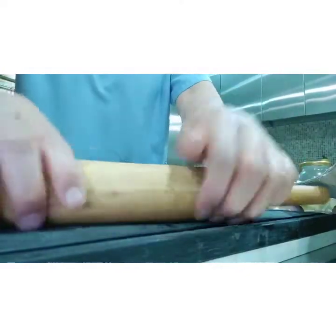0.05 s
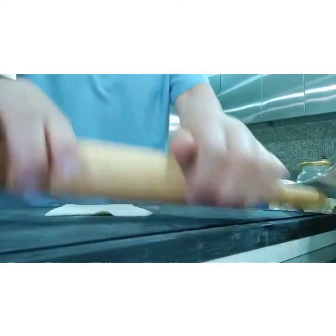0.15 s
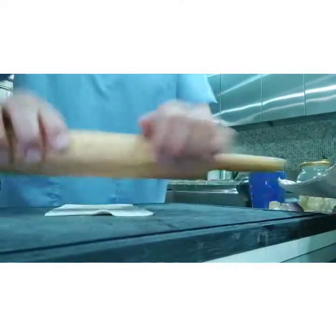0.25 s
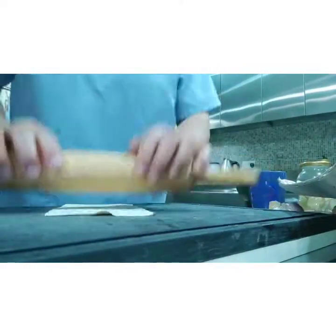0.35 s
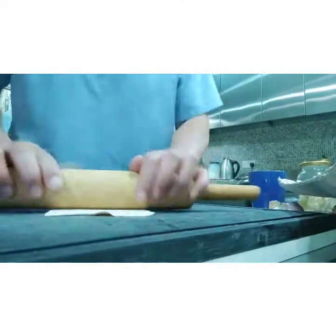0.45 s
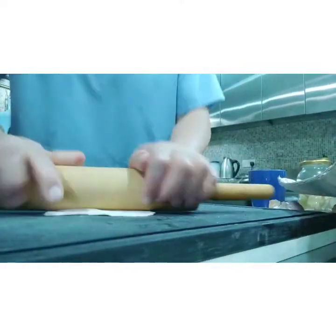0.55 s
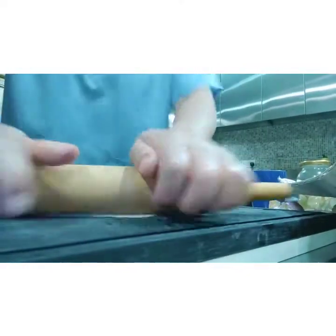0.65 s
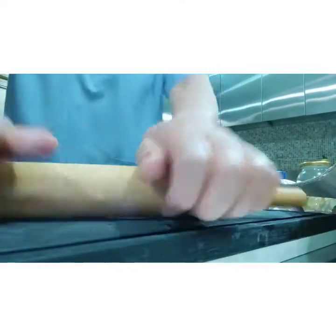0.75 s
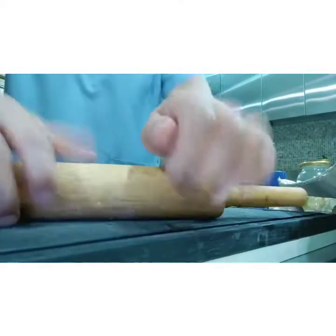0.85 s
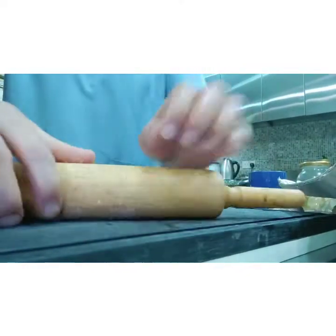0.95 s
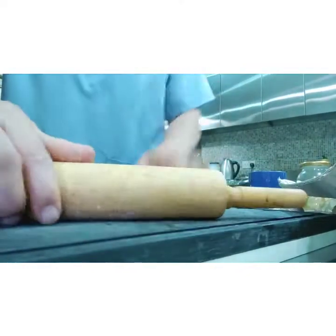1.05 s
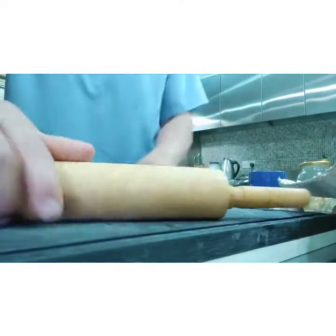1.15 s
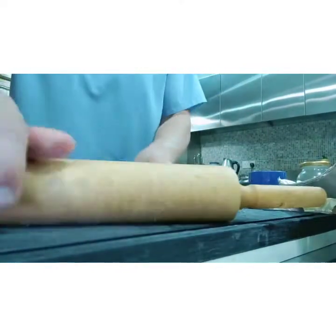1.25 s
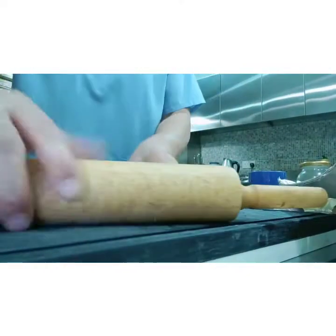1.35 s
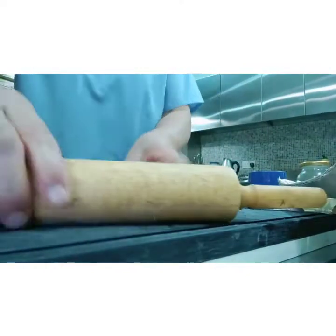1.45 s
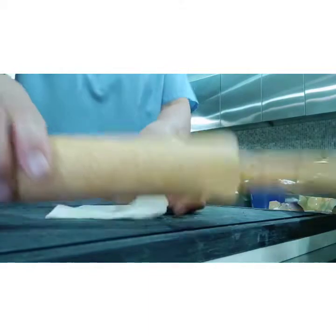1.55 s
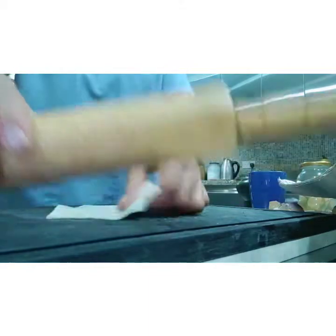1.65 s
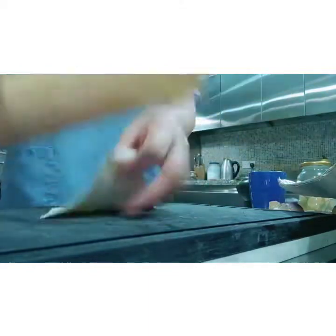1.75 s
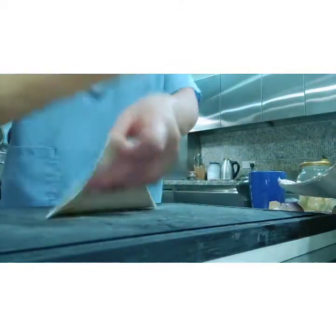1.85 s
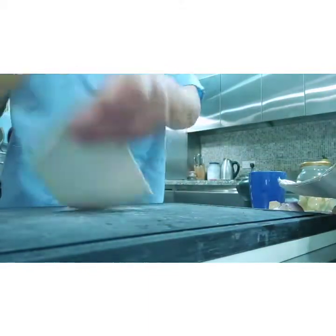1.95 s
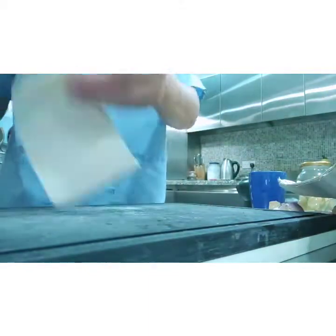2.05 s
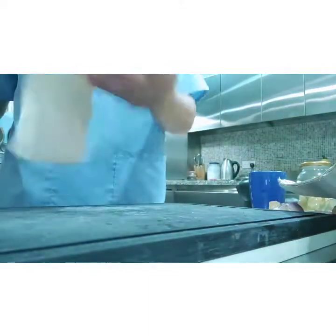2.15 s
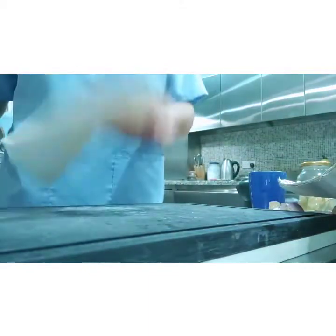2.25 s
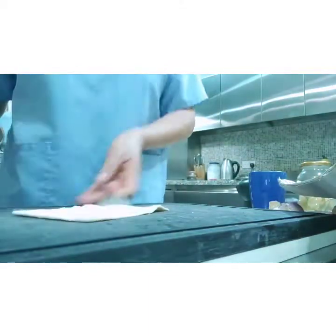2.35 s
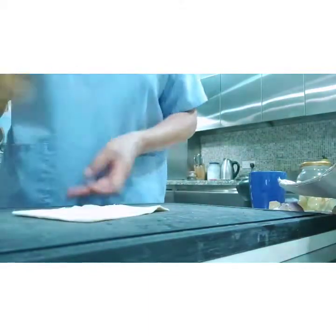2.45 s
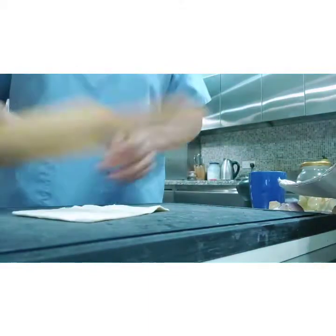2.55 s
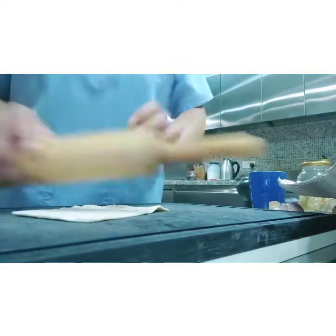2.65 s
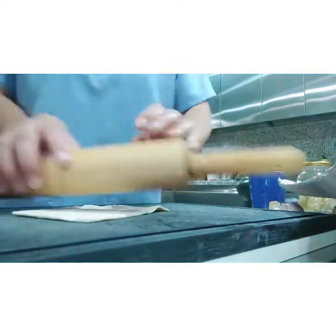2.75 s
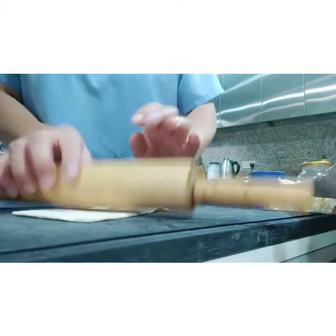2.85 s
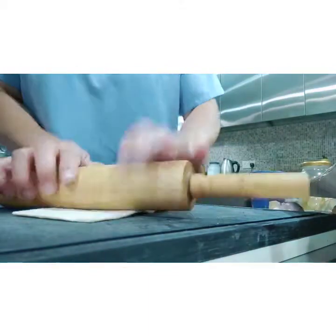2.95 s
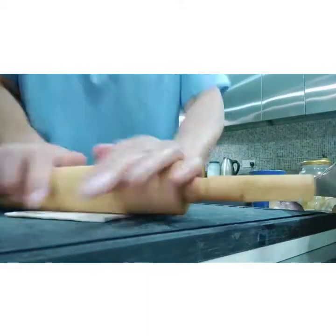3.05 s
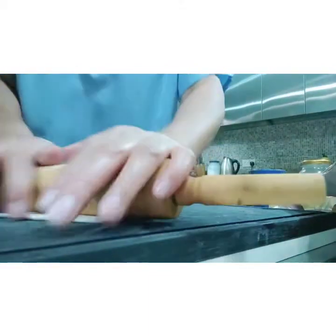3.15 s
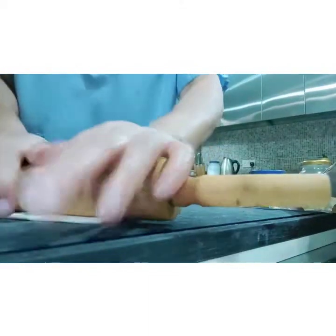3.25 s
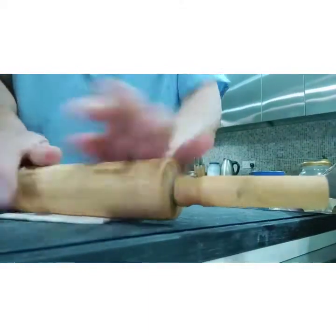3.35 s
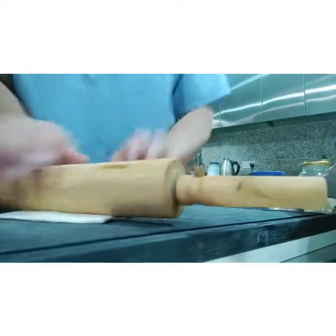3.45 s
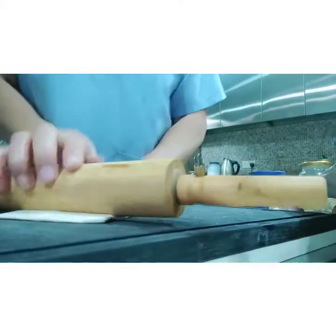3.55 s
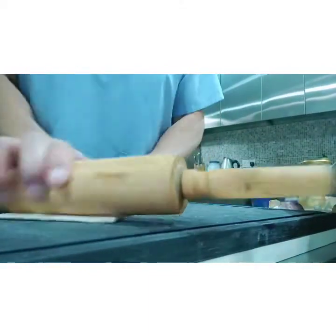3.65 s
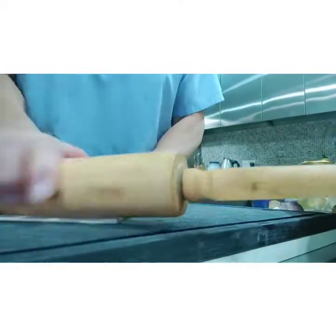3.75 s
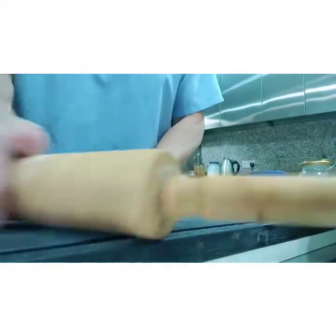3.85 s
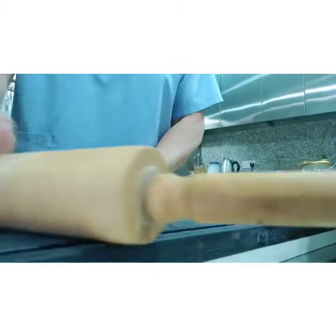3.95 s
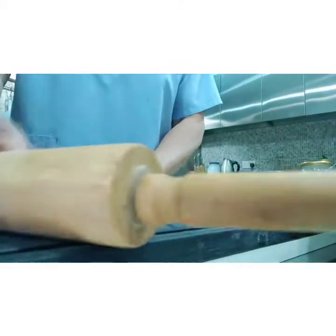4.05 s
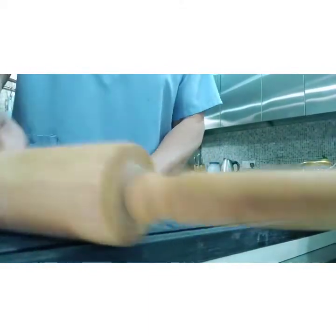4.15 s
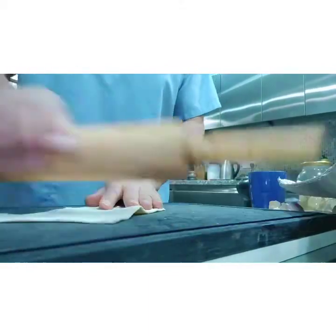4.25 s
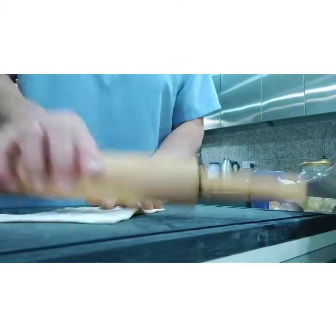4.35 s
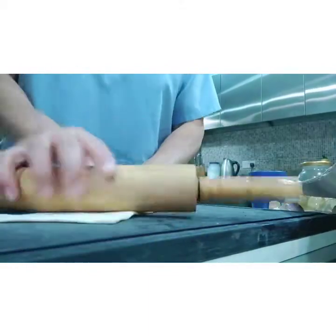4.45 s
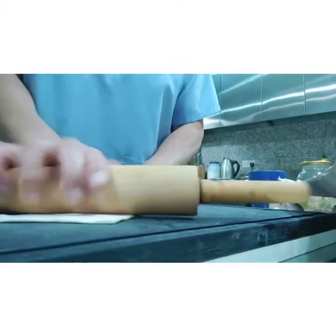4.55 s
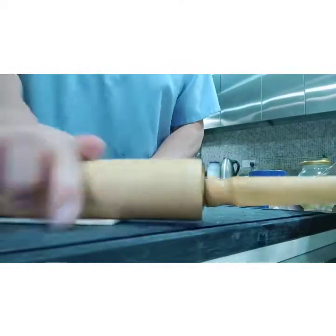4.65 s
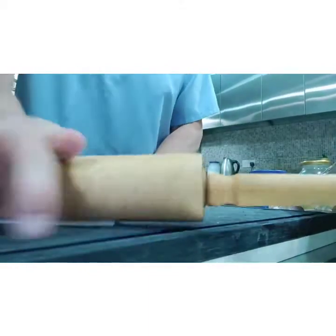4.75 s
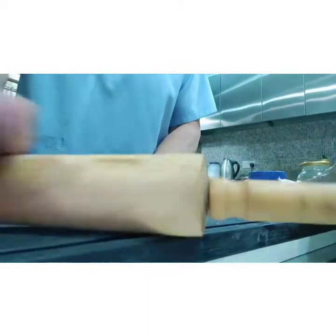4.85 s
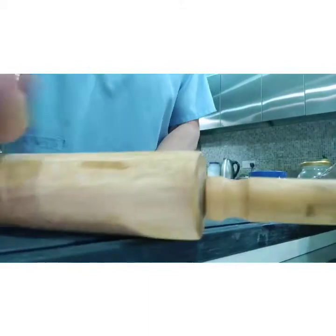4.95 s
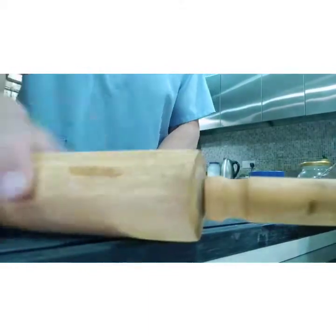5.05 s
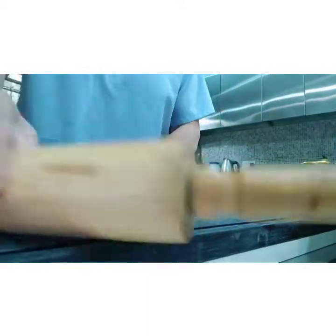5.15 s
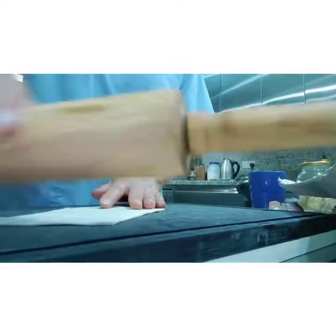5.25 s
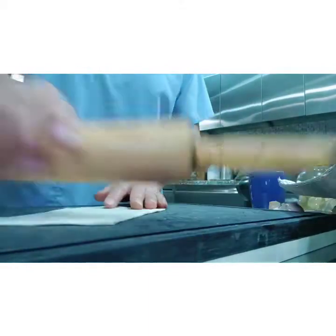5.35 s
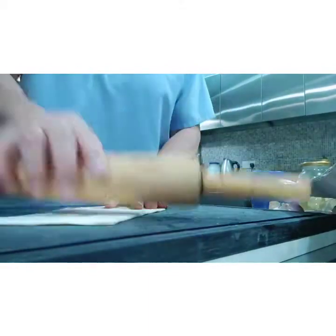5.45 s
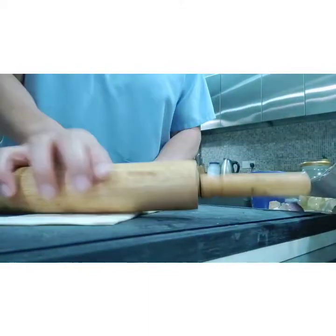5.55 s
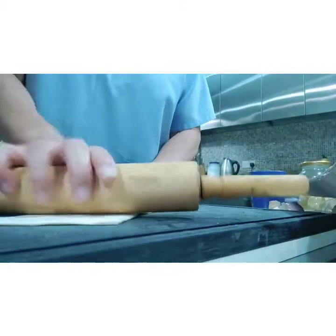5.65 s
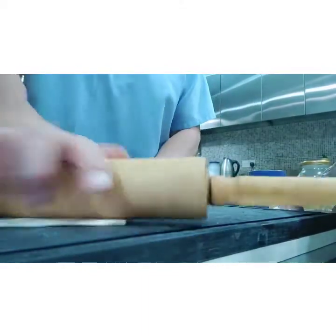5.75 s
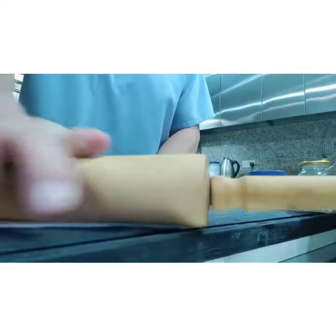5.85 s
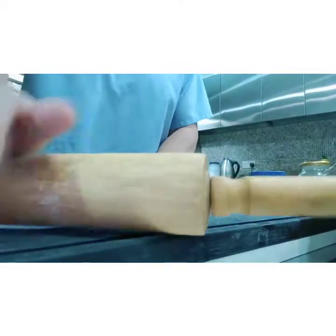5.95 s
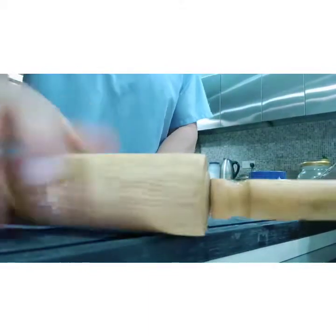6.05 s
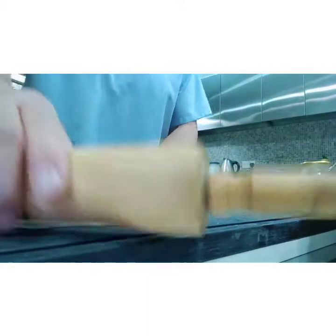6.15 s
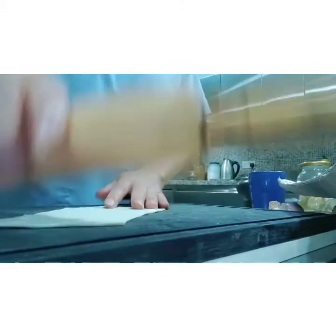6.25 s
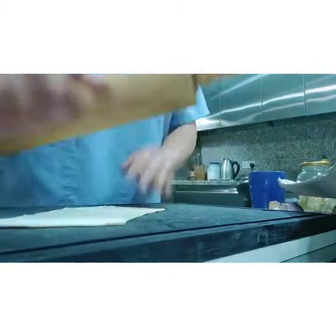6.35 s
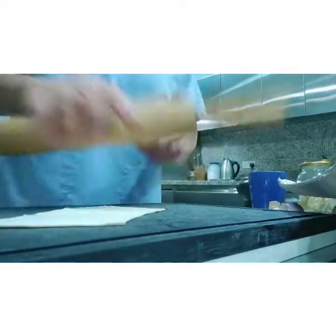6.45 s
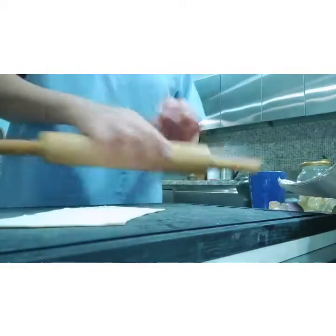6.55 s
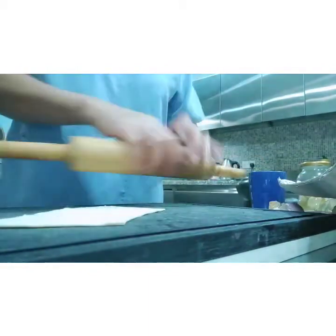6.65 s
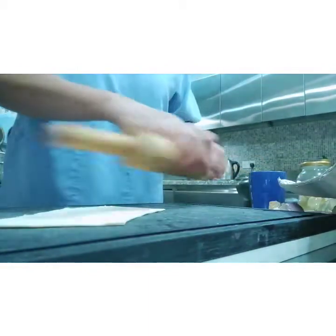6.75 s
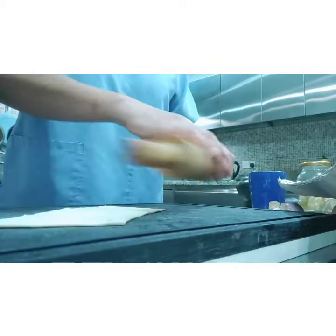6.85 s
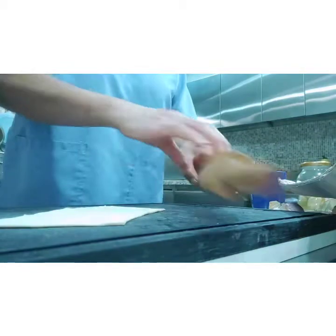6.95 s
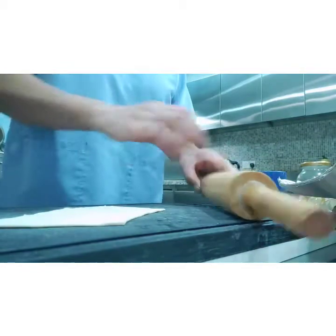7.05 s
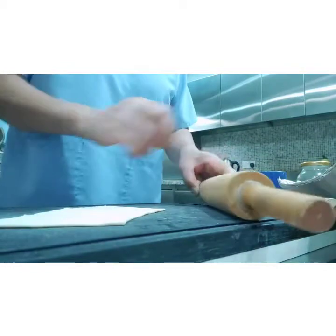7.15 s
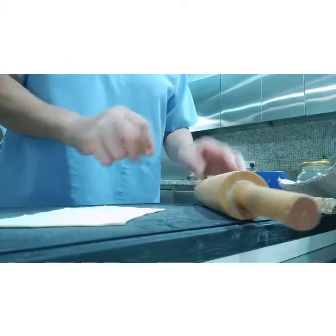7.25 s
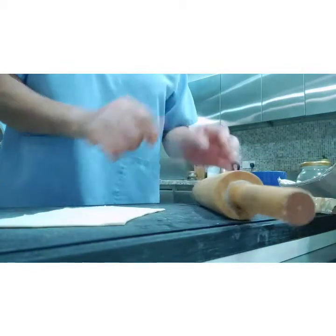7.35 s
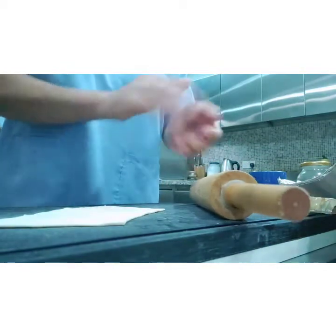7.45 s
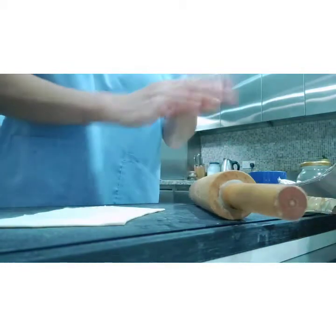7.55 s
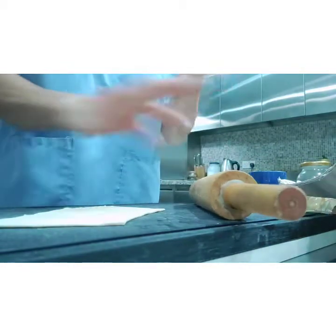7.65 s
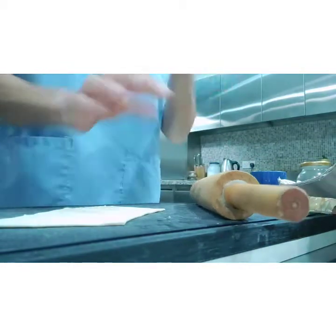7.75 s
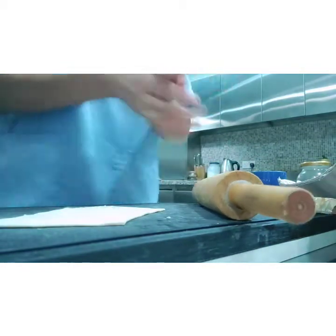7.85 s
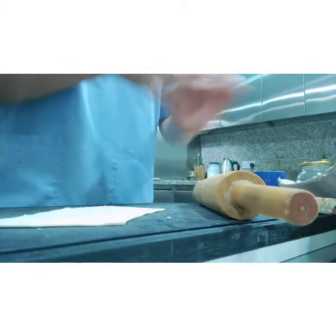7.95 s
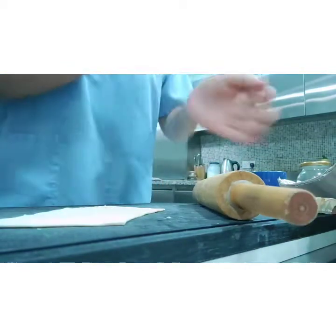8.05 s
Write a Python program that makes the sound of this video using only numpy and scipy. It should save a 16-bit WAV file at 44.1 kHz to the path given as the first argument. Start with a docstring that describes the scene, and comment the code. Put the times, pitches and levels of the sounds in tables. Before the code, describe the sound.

Over continuous low fan noise, someone rolls dough close to the microphones in a small, lightly echoing kitchen. A dull puffy thud opens, followed by small wooden knocks, a quiet gap, soft slaps and a thump. A crisp knock leads into a cluster of wood blows with bright rattling glass. Sparse knocks and faint hisses continue until one heavy wooden clack, then brushing palms and a final clap.

```python
"""Close pair of microphones by a kitchen counter, 8.1 s, with a fan as steady noise throughout.
0.3 s: a rolling pin thuds on dough (puffs of air, low board notes), then bare wood knocks (snap and ring).
2.3-2.9 s: soft slaps, a thud and a knock; 3.2 s: a hissing rub; 3.8-4.4 s: hard knocks, and a glass dish
nearby clinks and chatters (beating modes). 4.8-6.1 s: scattered knocks, rubs, a slap and faint glass.
6.8-7.1 s: short notes, the loudest knock, more glass; to the end: floury hands rub, pop and slap."""
import sys
import numpy as np
from scipy import signal
from scipy.fft import rfft, irfft, next_fast_len
from scipy.io import wavfile
from scipy.ndimage import uniform_filter1d

SR = 44100
rng = np.random.default_rng(int(sys.argv[2]) if len(sys.argv) > 2 else 0)


def to_wav(s):
    """Save 16-bit WAV."""
    ch = np.atleast_2d(s).T  # columns
    pcm = np.round(np.clip(ch, -1, 1) * 32767)  # PCM
    wavfile.write(sys.argv[1], SR, pcm.astype(np.int16))


def makeup_ratio(level_db):
    """Linear amplitude ratio for a level in decibels (20 dB per factor of ten)."""
    decades = np.asarray(level_db, float) / 20
    return 10 ** decades


N = 357210  # length in samples

# Fan noise spectrum, relative: f/Hz, density level/dB
FAN_SPECTRUM = [(20, 2.5), (45, -3.5), (65, -0.5), (200, -4.5), (500, -5.5), (1000, -16), (2000, -22),
                (7000, -37.5), (16000, -39)]
# The kitchen's standing waves: f/Hz, width/Hz, level over the fan/dB
STANDING_WAVES = [(83, 19.2, 10.5), (102, 4, 10), (132.5, 11.1, 21), (162, 20.2, 9.5), (237.6, 34.4, 10),
                  (287, 13.5, 9), (387.2, 8, 7.5), (894, 118, 5)]
# Likeness of the fan at the two ports: f/Hz, correlation (0 to 1)
FAN_LIKENESS = [(40, .87), (75, .88), (130, .94), (290, .75), (640, .5), (1400, .3), (3000, .15),
                (15000, .02)]
# Fan balance: f/Hz, left over right level/dB
FAN_BALANCE = [(60, 0), (400, -.5), (700, 0), (1300, -2.5), (2400, .5), (4400, 2.5), (15000, 1.5)]
FAN_DB, FAN_LEAD = -39.5, 15  # rms level/dB; samples by which the left port hears the fan first

# Decay of the kitchen's echoes: f/Hz, t60/s
ECHO_DECAY = [(150, 0.43), (600, 0.42), (2000, 0.41), (6000, 0.46), (14000, 0.065)]
ECHO_DB = -6.5  # echo level/dB
SOFT_SEND_DB, GLASS_SEND_DB = -10, -5  # send to the echo/dB; slaps happen next to the ports

# Colour of the microphone housing's ports: f/Hz, level/dB
PORT_RESPONSE = [(20, -0.5), (1700, 5), (2400, 4), (3200, -2), (4000, -7.5), (4800, -7.5), (6000, 1),
                 (7200, 7.5), (8500, 2), (10000, -8.5), (12000, -13), (15000, -12), (16500, -24),
                 (17000, -82)]
WIDEST_LAG = 15  # samples by which the farther port hears a sound from the far side later
# Left over right level/dB, by where each thing lies
GLASS_LEAN_DB, SLAP_LEAN_DB, RUB_LEAN_DB, ROCK_LEAN_DB = 5, 5, 3.5, 1.5

# Skin, flour or a glass rim rubbing: t/s and level/dB at full pressure, build-up/s, release/s
RUB_STROKES = [(3.234, -51, .044, 0.022), (2.89, -53, .04, 0.044), (4.79, -58, 0.045, .05),
               (5.825, -45, .03, .045), (6.04, -52, .03, .05), (7.5, -47, .1, .07), (7.77, -47, .05, 0.12),
               (7.845, -42.5, .1, 0.13), (8.078, -42, .012, 0.088)]
# Spectrum of the rubbing hiss, relative: f/Hz, level/dB
RUB_SPECTRUM = [(1500, -19), (4000, -5.5), (8000, -8), (15000, 4.5)]
RUB_ENDS_DB = -18  # level where a stroke begins and ends, under full pressure

# Short single notes, like a cupped palm or a nudged jar: t/s, level/dB, f/Hz, rise/ms, t60/s
POP_NOTES = [(6.787, -33, 1336, 13, 0.055), (6.787, -38, 2218, 13, 0.061), (7.427, -42.5, 1900, 2.7, 0.02),
             (7.765, -23, 950, 1.7, 0.02)]

# Glass touched: t/s, peak level/dB, most excited f/Hz, fall-off/dB per octave, chatter/ms
GLASS_TOUCHES = [(3.868, -37.5, 2600, 6, 3), (3.937, -41, 4000, -1, 22), (4.012, -38.5, 2600, 6, 4.4),
                 (4.039, -25.5, 2560, 14, 8), (4.063, -30.5, 8100, 4.5, 6.9), (4.096, -34, 7200, 8, 19.4),
                 (4.139, -27.5, 2580, 10, 4.2), (4.2028, -27, 2900, 9, 3.6), (4.213, -37, 1290, 18, 2.5),
                 (4.301, -23, 2600, 8, 6.8), (4.325, -29, 2700, 7, 4), (4.357, -21.5, 2700, 13, 6.6),
                 (4.381, -24, 3300, 26, 5.2), (4.423, -35, 2600, 3, 6.7), (4.441, -40, 4960, 5, 15.3),
                 (5.767, -47, 6000, 13, 4.5), (5.814, -41, 5000, 12, 6), (5.83, -40, 6070, 16, 11),
                 (6.029, -38.5, 5900, 15, 31), (6.030, -36, 2600, 18, 11.6), (6.092, -35, 2570, 16, 14),
                 (6.109, -35.5, 2590, 20, 9.1), (6.977, -28.5, 3000, 27, 24), (7.004, -43, 3200, 14, 26),
                 (7.056, -33.5, 2400, 3, 8)]
# Modes of the glass: f/Hz, width/Hz, relative level/dB
GLASS_MODES = [(1290, 25, -11), (1850, 100, 0.5), (2060, 56, -9), (2595, 97, 1.5), (2900, 54, -11.5),
               (3200, 40, -13.5), (6000, 59, -14), (7200, 95, -24.5), (8000, 28, -17), (7920, 28, -16.5),
               (9020, 120, -37.5), (10800, 100, -9), (12600, 140, -21), (13800, 110, -9)]

# The pin rocks to rest after a blow: t/s, starting level/dB, t60/s
ROCKING_SPELLS = [(.335, -37.5, 0.14), (2.834, -38.5, .16), (3.79, -38, 0.042), (4.304, -35.5, 0.13),
                  (4.358, -28, 0.069), (6.955, -37.5, 0.21), (7.056, -46, 0.16)]
ROCKS_PER_S = 1200

# Weight landing on the board: t/s, board peak level/dB, peak level of the jolt through the counter/dB
BOARD_THUMPS = [(0.3115, -22.5, -30), (0.3207, -18, -32), (2.794, -28, -23.5), (2.808, -27.5, -25),
                (3.786, -23, -46), (4.301, -24.5, -34), (5.387, -32.5, -26.5), (5.407, -47, -29),
                (6.950, -29, -45)]
# Board under a soft blow: f/Hz, relative level/dB, t60/s
BOARD_MODES = [(154, -19, 0.27), (245, 9, 0.057)]
# The counter's sway: f/Hz, relative level/dB, t60/s
SWAY_MODES = [(27.5, 0, 0.42)]

# Pin, dough or palms landing flat: t/s, puff level/dB, puff length/ms, hiss over puff/dB, smack level/dB
FLAT_LANDINGS = [(0.3197, -27.5, 4.7, -0.5, -43), (0.602, -44.5, 2.6, 8.5, -37), (2.265, -35, 2.4, -9, -27),
                 (2.302, -43, 2.4, -14, -38), (2.802, -31.5, 5.57, -9, -22), (5.391, -40, 5.3, -4, -38),
                 (7.939, -49, 1.5, 13, -56), (8.07, -37.5, 3.8, 3.5, -27)]
# Body of the air puff, relative: f/Hz, level/dB
PUFF_SPECTRUM = [(400, 0.5), (1100, -5), (1800, -1), (2400, 4), (3000, -7.5), (5000, -17)]
# Hiss of the air puff, relative: f/Hz, level/dB
HISS_SPECTRUM = [(2500, -8), (5000, 8), (8000, 0), (12000, 4), (15500, 11.5)]
# The far end lands a moment later: longer, duller, and the stronger the broader the landing
FAR_END_S, FAR_END_LONGER, FAR_END_DB, FAR_END_DB_PER_MS = .0075, 2.32, -16, 3
FAR_END_HISS_DB, FAR_END_SMACK_DB = -15, -10

# Bare wood on the counter: t/s, peak level/dB, left over right level/dB, snap f/Hz, grit level/dB
WOOD_KNOCKS = [(.586, -24, 1, 547, -40), (.656, -30, 2, 1150, -33), (.684, -30, 1.5, 496, -35),
               (.694, -28, 1, 980, -13), (.742, -32.5, -2, 705, -30), (2.843, -20, -3.5, 835, -14),
               (3.786, -12, -3, 1100, -28), (3.807, -29, -3, 790, -31), (3.824, -27, 5, 670, -37),
               (3.867, -27, 4, 600, -28), (4.202, -24.5, -2, 1236, -33), (4.301, -15, -2, 955, -13.5),
               (4.312, -18, -8.5, 520, -13), (4.349, -19.5, 1, 600, -11), (4.358, -23, -6, 920, -26),
               (4.380, -30, 1, 905, -37), (4.421, -22.5, 2.5, 1100, -21), (4.779, -25, -7.5, 775, -28),
               (5.917, -28.5, -4.5, 960, -42), (6.026, -23, -5, 900, -35), (6.087, -29, 2, 860, -18),
               (6.108, -26.5, -2, 1220, -30), (6.9497, -8.5, 0, 667, -12.5), (6.9544, -12, -5, 715, -36),
               (6.980, -24, -2, 490, -37), (7.052, -18, 1, 636, -28), (7.059, -24.5, -6, 760, -23)]
# Modes of the counter: f/Hz, relative level/dB, t60/s
COUNTER_MODES = [(218, -21, 0.4), (324.5, -2, 0.05), (390, 1, 0.073), (510, -6.5, 0.1), (600, 4, 0.032),
                 (781, -6.5, 0.079), (850, -46, 0.023), (1135, -14.5, 0.065), (1290, -13, 0.041),
                 (1780, -8.5, 0.072), (2190, -9, .05), (2410, -19, .04)]
RING_DB, RING_DB_PER_OCTAVE, DULL_HZ = -0.5, -8, 710  # the duller the contact, the more the counter rings
RING_DB_PER_DB, MIDDLING_DB = -0.16, -20.5  # a hard blow is more snap than ring


def evened(x):
    """Scales to rms 1."""
    return x / np.sqrt(np.mean(x ** 2) + 1e-20)


def peaked(x):
    """Scales to peak 1."""
    return x / (abs(x).max() + 1e-20)


def read(points, hz):
    """Reads a table on a log-frequency axis."""
    f, value = np.transpose(points)
    return np.interp(np.log(hz + 1), np.log(f + 1), value)


def add(mix, s, sound, lean_db):
    """Places a sound; the nearer port gets it louder and earlier."""
    lag = WIDEST_LAG * np.tanh(lean_db / 3)
    for side, sign in enumerate((1, -1)):
        part = mix[side, round(s * SR - sign * lag / 2):][:len(sound)]
        part += makeup_ratio(sign * lean_db / 2) * sound[:len(part)]


def ring(modes, seconds):
    """Sum of dying sines, one for each mode."""
    t = np.arange(round(seconds * SR)) / SR
    return sum(makeup_ratio(db - 60 * t / max(t60, .003)) * np.sin(2 * np.pi * hz * t) for hz, db, t60 in modes)


def push(ms):
    """Force of one contact, a smooth hump of area 1."""
    force = np.hanning(max(round(ms * SR / 1000), 1) + 2)
    return force / force.sum()


def coloured_noise(size, gain_db):
    """White noise through a spectrum given as a function of Hz, rms 1."""
    spectrum = rfft(rng.standard_normal(size)) * makeup_ratio(gain_db(np.fft.rfftfreq(size, 1 / SR)))
    return evened(irfft(spectrum, size))


def wander(size, width):
    """Slow random fluctuation of rms 1: noise averaged over width samples."""
    return evened(uniform_filter1d(rng.standard_normal(size), width))


def fan():
    """Steady air noise that the standing waves lift, less alike at the ports as pitch rises."""
    size = next_fast_len(N)
    hz = np.fft.rfftfreq(size, 1 / SR)
    lift = 1 + sum(makeup_ratio(db) ** 2 / (1 + (2 * (hz - f) / width) ** 2) ** 2 for f, width, db in STANDING_WAVES)
    left, other = rfft(rng.standard_normal((2, size)))
    same = np.clip(read(FAN_LIKENESS, hz), -1, 1)
    delayed = left * np.exp(-2j * np.pi * hz * FAN_LEAD / SR)
    ports = np.array([left, same * delayed + np.sqrt(1 - same ** 2) * other])
    balance_db = np.outer([.5, -.5], read(FAN_BALANCE, hz))
    ports *= np.sqrt(lift) * makeup_ratio(read(FAN_SPECTRUM, hz) + balance_db)
    return makeup_ratio(FAN_DB) * evened(irfft(ports, size)[:, :N])


def kitchen(x):
    """Echoes: sparse taps of random sign, other ones for each port, each band dying at its own speed."""
    taps = np.zeros((2, SR))
    at = np.arange(140, SR - 20, 20) + rng.integers(0, 20, (2, (SR - 141) // 20))
    np.put_along_axis(taps, at, rng.choice([-1., 1.], at.shape), 1)
    hz, t, bands = signal.stft(taps, SR, nperseg=256)
    decay = makeup_ratio(-60 * t / read(ECHO_DECAY, hz)[:, None])
    tail = signal.istft(bands * decay, SR, nperseg=256)[1]
    tail[1] = .5 * tail[0] + 1.29 * tail[1]  # the ports share part of the echoes
    tail = tail / np.linalg.norm(tail[0])
    return signal.fftconvolve(x.mean(0)[None], tail, axes=1)[:, :N]


def rub(db, build_s, release_s):
    """Dense fine grains under a stroke that presses harder, then lifts."""
    t = np.arange(-build_s, release_s, 1 / SR)
    grain = makeup_ratio(2.0 * wander(len(t), 90))
    hiss = evened(grain * coloured_noise(len(t), lambda hz: read(RUB_SPECTRUM, hz)))
    away = np.maximum(-t / build_s, t / release_s)  # 0 at full pressure, 1 at the ends
    return makeup_ratio(db + RUB_ENDS_DB * away) * hiss * signal.windows.tukey(len(t), .2)


def pop(db, hz, rise_ms, t60):
    """One short, dying note whose level is roughened at random."""
    note = ring([(hz, db, t60)], .15)
    rough = 1 + .4 * wander(len(note), 80)
    return note * rough * np.minimum(np.arange(len(note)) / SR * 1000 / rise_ms, 1)


def clink(db, focus_hz, fall_db, chatter_ms):
    """A touch and a quick chatter feed energy into each mode, a close beating pair that then dies away."""
    t = np.arange(round(.25 * SR)) / SR
    when, size = rng.random((2, 10))
    fed = np.zeros(len(t))
    fed[(when * chatter_ms * SR / 1000).astype(int)] = .4 * size
    fed[0] = 1  # the first touch
    tick_level = np.sqrt(signal.lfilter([1], [1, -.985], fed))  # every touch ticks
    scrape = tick_level * np.diff(rng.standard_normal(len(t) + 1))
    sound = makeup_ratio(-10 - fall_db) * scrape
    for (hz, width, level), (vary, split, phase) in zip(GLASS_MODES, rng.standard_normal((len(GLASS_MODES), 3))):
        energy = signal.lfilter([1], [1, -np.exp(-2 * np.pi * width / SR)], fed)
        twin_hz = hz * (1.015 + 0.0045 * split)
        pair = np.sin(2 * np.pi * hz * t) + 0.66 * np.sin(2 * np.pi * twin_hz * t + 2 * phase)
        pair *= 1 + .3 * wander(len(t), 150)  # each mode's level is roughened at random
        mode_db = level + 2 * vary - fall_db * abs(np.log2(hz / focus_hz))
        sound += makeup_ratio(mode_db) * np.sqrt(energy) * pair
    return makeup_ratio(db) * peaked(sound)


def rocking(db, t60):
    """Many tiny wooden taps at ten pitches, at random moments, dying away."""
    t = np.arange(0, t60 / 2, 1 / SR)
    sound = np.zeros(len(t))
    for hz in np.geomspace(900, 3600, num=10):
        taps = (rng.random(len(t)) < ROCKS_PER_S / 10 / SR) * rng.standard_normal(len(t))
        sound += np.convolve(taps, ring([(hz, 0, 22 / hz)], .03))[:len(t)]
    return makeup_ratio(db - 60 * t / t60) * evened(sound) * signal.windows.tukey(len(t), .15)


def thump(board_db, jolt_db):
    """A soft, long contact favours the lowest modes; the sway starts the other way."""
    force = push(2.74)
    board = peaked(np.convolve(force, ring(BOARD_MODES, .3)))
    jolt = peaked(np.convolve(force, ring(SWAY_MODES, .3)))
    return makeup_ratio(jolt_db) * jolt - makeup_ratio(board_db) * board


def snap(hz):
    """A sine that swells within about half a cycle and dies over a few."""
    note = ring([(hz, 0, 5.5 / hz)], .03)
    return peaked(note * (1 - np.exp(-np.arange(len(note)) / SR * hz * 3)))


def slap(db, puff_ms, hiss_db, smack_db):
    """Skin or dough smacks and the squeezed air escapes as a ragged puff."""
    u = np.arange(2600) / SR * 1000 - 9  # ms from the contact
    rise = np.exp(np.minimum(u, 0) / (.3 * puff_ms))
    shape = np.where(u < 0, rise, np.exp(-(np.maximum(u, 0) / puff_ms) ** 2))
    ragged = makeup_ratio(2 * wander(len(u), 60))
    body = coloured_noise(len(u), lambda hz: read(PUFF_SPECTRUM, hz))
    hiss = coloured_noise(len(u), lambda hz: read(HISS_SPECTRUM, hz))
    sound = makeup_ratio(db) * (body + makeup_ratio(hiss_db) * hiss) * shape * ragged
    smack = makeup_ratio(smack_db) * snap(1200)
    sound[u >= 0] -= np.pad(smack, (0, np.sum(u >= 0) - len(smack)))
    return sound


def knock(db, snap_hz, grit_db):
    """The pin's stop sends a snap; the same force rings the counter, its modes varying from knock to knock."""
    vary_db = rng.normal(0, 2, len(COUNTER_MODES))  # each mode's level varies a little at random
    modes = np.add(COUNTER_MODES, np.outer(vary_db, [0, 1, 0]))
    force = push(500 / snap_hz)  # half a cycle long
    ring_db = RING_DB + RING_DB_PER_OCTAVE * np.log2(snap_hz / DULL_HZ) + RING_DB_PER_DB * (db - MIDDLING_DB)
    sound = -makeup_ratio(ring_db) * peaked(np.convolve(force, ring(modes, .2)))
    stop = snap(snap_hz)
    sound[:len(stop)] -= stop
    # grit is crushed at the contact
    grit = coloured_noise(500, lambda hz: -7 * np.log2(1 + (hz / 3200) ** 2) - 6 * np.log2(1 + 1200 / (hz + 1)))
    sound[:500] += makeup_ratio(grit_db - np.arange(500) * 0.055) * grit
    return makeup_ratio(db) * peaked(sound)


def scene():
    """Everything on the counter, its echoes and the fan."""
    wood, glass, soft = np.zeros((3, 2, N))
    for s, db, build_s, release_s in RUB_STROKES:
        add(soft, s - build_s, rub(db, build_s, release_s), RUB_LEAN_DB)
    for s, *how in POP_NOTES:
        add(soft, s, pop(*how), 0)
    for s, *how in GLASS_TOUCHES:
        add(glass, s, clink(*how), GLASS_LEAN_DB)
    for s, *how in ROCKING_SPELLS:
        add(wood, s, rocking(*how), ROCK_LEAN_DB)
    for s, *how in BOARD_THUMPS:
        add(soft, s, thump(*how), 0)
    for s, db, ms, hiss_db, smack_db in FLAT_LANDINGS:
        start = s - .009  # the puff begins 9 ms before the contact
        add(soft, start, slap(db, ms, hiss_db, smack_db), SLAP_LEAN_DB)
        late_db = FAR_END_DB + FAR_END_DB_PER_MS * ms
        far_smack_db = smack_db + late_db + FAR_END_SMACK_DB
        far_end = slap(db + late_db, FAR_END_LONGER * ms, hiss_db + FAR_END_HISS_DB, far_smack_db)
        add(soft, start + FAR_END_S, far_end, SLAP_LEAN_DB)
    for s, db, lean_db, *how in WOOD_KNOCKS:
        add(wood, s, knock(db, *how), lean_db)
    echo = kitchen(wood + makeup_ratio(GLASS_SEND_DB) * glass + makeup_ratio(SOFT_SEND_DB) * soft)
    return wood + glass + soft + makeup_ratio(ECHO_DB) * echo + fan()


def low_pass(x):
    """Removes everything above the highest recorded frequency."""
    return signal.sosfilt(signal.butter(12, 16670, fs=SR, output="sos"), x)


def record(dry):
    """Colours both channels by the microphone ports, as a causal (minimum-phase) filter."""
    log_gain = np.log(makeup_ratio(read(PORT_RESPONSE, abs(np.fft.fftfreq(4096, 1 / SR)))))
    taps = np.fft.ifft(np.exp(np.conj(signal.hilbert(log_gain)))).real[:2048]
    mix = signal.oaconvolve(dry, taps[None])[:, :N]
    return low_pass(mix)


dry = scene()
out = record(dry)
to_wav(out)
```